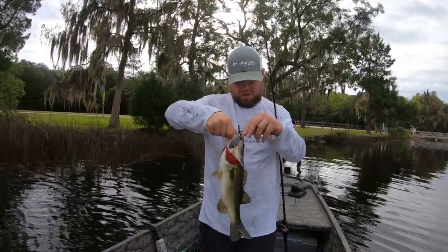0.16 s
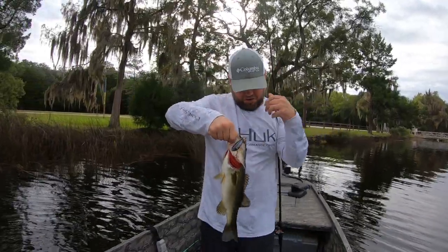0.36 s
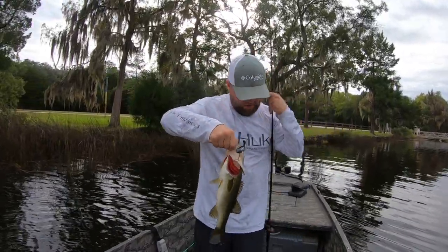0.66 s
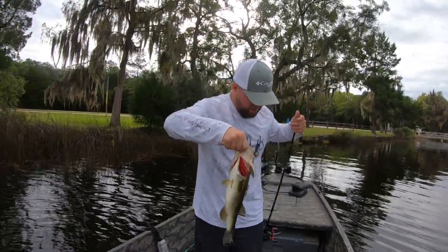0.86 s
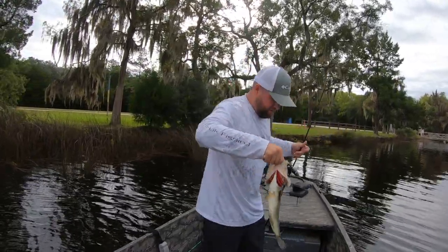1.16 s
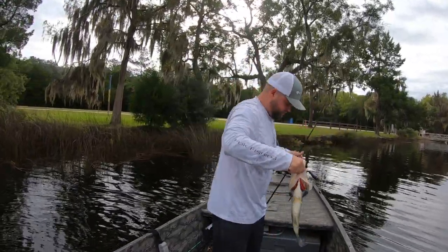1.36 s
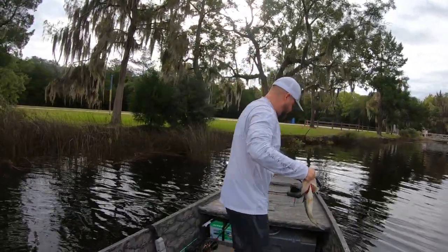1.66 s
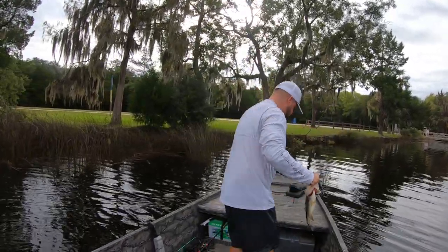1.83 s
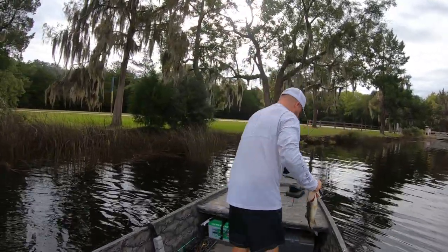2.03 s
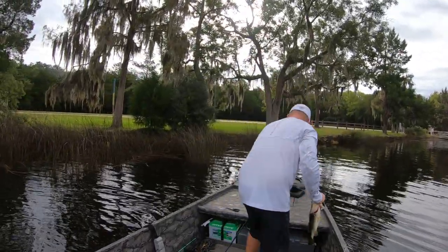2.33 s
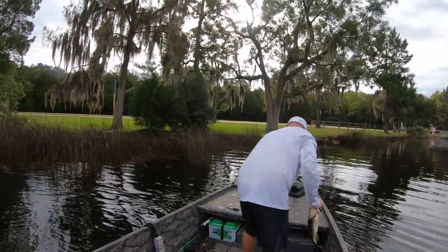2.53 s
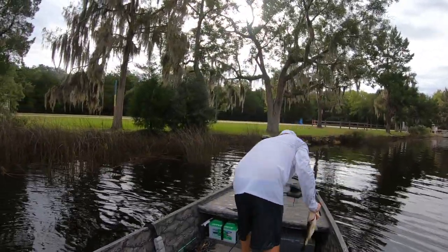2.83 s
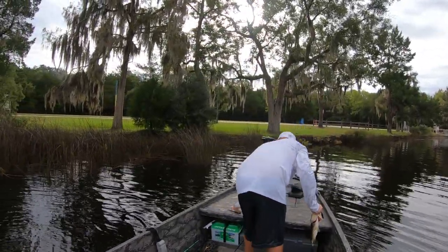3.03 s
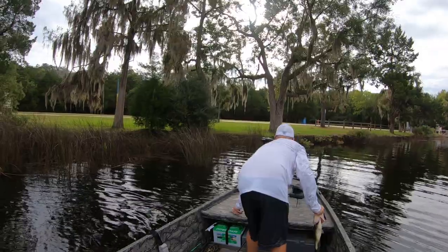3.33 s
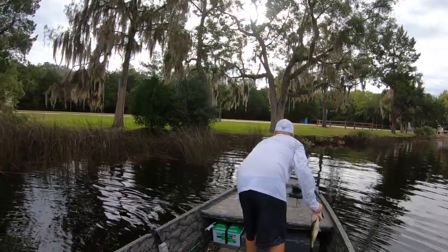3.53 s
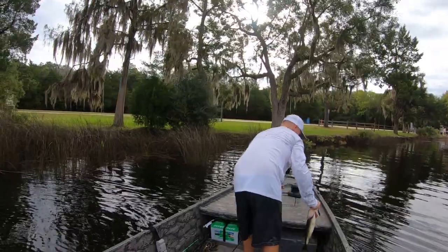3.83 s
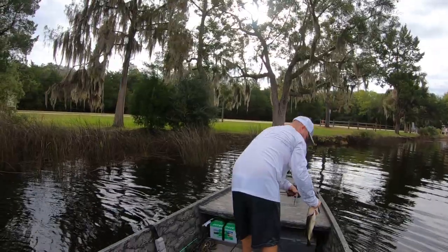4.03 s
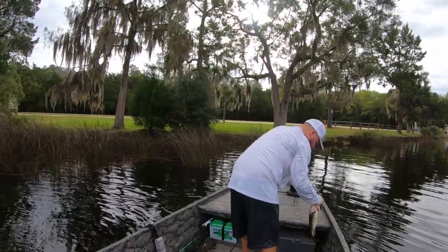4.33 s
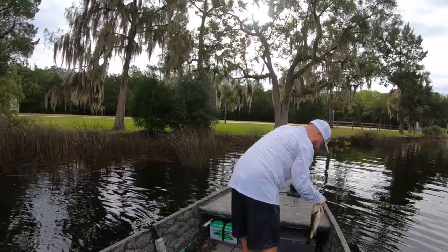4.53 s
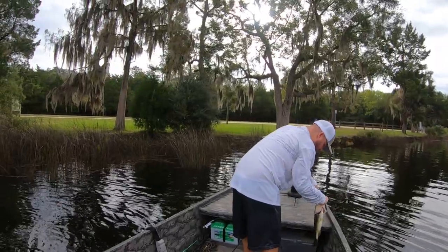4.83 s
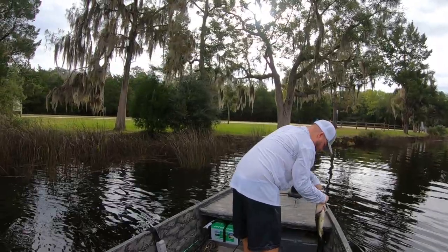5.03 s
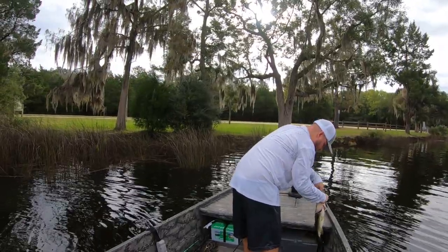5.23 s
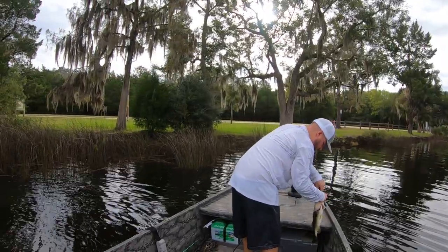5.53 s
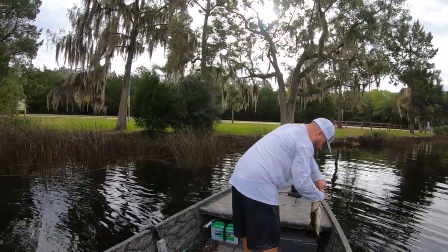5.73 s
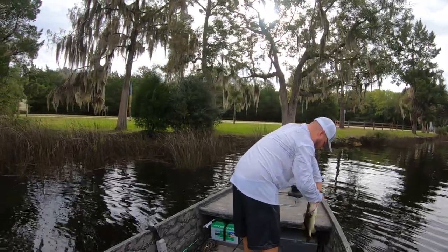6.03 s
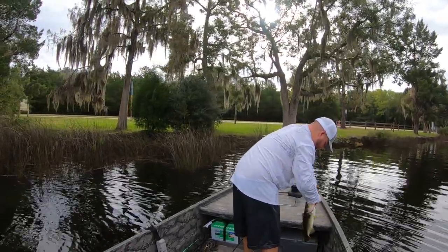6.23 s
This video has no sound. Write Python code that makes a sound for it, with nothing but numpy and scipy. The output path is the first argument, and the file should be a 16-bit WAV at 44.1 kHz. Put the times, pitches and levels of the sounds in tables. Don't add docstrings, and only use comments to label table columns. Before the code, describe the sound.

Outdoors on still water, a boat-mounted microphone hears soft open air, a low drone, distant road hum and very faint insects throughout. From 0 to 1.2 s there are light deck knocks, sole scuffs and cloth rustles, with bright lure clicks strongest near 0.63 s and short rubbery squeaks around 0.8 s. A step thuds at 1.3 s, with more scuffing and squeaking until 1.6 s, then a lull. Heavy steps boom in the hollow hull from 2.1 s, deepest around 2.36 s, with a heel rocking near 2.65 s. A rod butt cracks on the metal rim at 2.92 s and bounces at 3.0 s. From 3.27 s a loose lid bangs, drags and clatters, dropping hard at 3.53 s; its ring is stilled by 3.75 s. Then mostly quiet: faint knocks, bird whistles around 5.3 s, sharp small ticks at 5.95 and 6.12 s.

```python
import sys
import numpy as np
from scipy import signal
from scipy.fft import rfft, irfft, next_fast_len
from scipy.io import wavfile

SR = 44100
rng = np.random.default_rng(int(sys.argv[2]) if len(sys.argv) > 2 else 0)


def wav_record(signal):
    frames = np.transpose(np.atleast_2d(signal))
    bounded = np.clip(frames, -1, 1)
    quanta = np.round(bounded * 32767).astype(np.int16)
    wavfile.write(sys.argv[1], SR, quanta)


def boost_factor(decibels):
    exponent = np.asarray(decibels, float) / 20
    return 10 ** exponent


N = 281358


def at_hz(points, hz):
    points = np.array(points)
    return np.interp(np.log(hz), np.log(points[:, 0]), points[:, 1])


def rms_one(x):
    return x / np.sqrt(np.mean(x ** 2) + 1e-20)


def band_pass(x, order, low_hz, high_hz):
    return signal.sosfilt(signal.butter(order, [low_hz, high_hz], "band", fs=SR, output="sos"), x)


def drift(rate):
    knots = rng.standard_normal(int(N / SR * rate * 2) + 2)
    return np.interp(np.linspace(0, len(knots) - 1, N), np.arange(len(knots)), knots) * 2.51


def ring(force, hz, t60):
    r = boost_factor(-60 / (t60 * SR))
    w = 2 * np.pi * hz / SR
    return signal.lfilter([0, np.sin(w)], [1, -2 * r * np.cos(w), r * r], force + 1e-18)


def fade(x, t60):
    r = boost_factor(-60 / (t60 * SR))
    return signal.lfilter([1 - r], [1, -r], x + 1e-18)


def strike(modes, times, peak_db, spread_db, contact_s, chatter, low_hz, high_hz, rub=0, flip=-1):
    at = (np.clip(times, 0, None) * SR).astype(int)
    share = np.sqrt(sum(boost_factor(db) ** 2 for hz, db, t60 in modes))
    luck = rng.standard_normal((len(at), len(modes)))
    out, clicks = np.zeros(N), np.zeros(N)
    np.add.at(clicks, at, boost_factor(peak_db))
    after = chatter * fade(clicks, contact_s) * rng.standard_normal(N) * np.sqrt(contact_s * SR / 7)
    for k, (hz, level_db, t60) in enumerate(modes):
        force = after + rub * np.sqrt(28 / (t60 * SR))
        np.add.at(force, at, boost_factor(peak_db + spread_db * luck[:, k]))
        out += boost_factor(level_db) / share * ring(force, hz, t60) * flip ** k
    return band_pass(out, 3, low_hz, high_hz)


def friction(level_db):
    grain_db = 3.6 * drift(120) + 2.9 * drift(30)
    return boost_factor(level_db) * rms_one(rng.standard_normal(N) * boost_factor(grain_db))


def sliding(strokes, hiss_db):
    press_db_per_s, lift_db_per_s, swing_db = 302, 333, 24
    levels, t = np.full((4, N), -140.), np.arange(N) / SR
    for s, held, rasp_db, rumble_db, panels_db in strokes:
        on = slice(int((s - .3) * SR), int((s + held + .3) * SR))
        eased = np.maximum(press_db_per_s * (s - t[on]), lift_db_per_s * (t[on] - s - held)).clip(0)
        gone = 10 * (eased - swing_db).clip(0)
        layers = [rasp_db - eased,
                  rumble_db - 0.43 * eased,
                  rasp_db + panels_db - 0.78 * eased,
                  rasp_db + hiss_db - eased]
        levels[:, on] = np.maximum(levels[:, on], layers - gone)
    return levels


def glides(notes, rough_db, rough_hz):
    out = np.zeros(N)
    for s, length, from_hz, to_hz, level_db in notes:
        part = np.linspace(0, 1, int(length * SR))
        hz = from_hz * (to_hz / from_hz) ** part
        swell = np.abs(np.sin(np.pi * part)) ** 0.28
        tone = swell * np.sin(2 * np.pi * np.cumsum(hz) / SR)
        out[int(s * SR):int(s * SR) + len(part)] += boost_factor(level_db) * tone
    return out * boost_factor(rough_db * drift(rough_hz))


# frequency in Hz, likeness from -1 to 1.
LIKENESS = [(60, 0.7), (170, 0.35), (460, -0.74), (1260, -0.78), (3490, 0.55), (9630, -0.19)]


def pair(white, hz):
    alike = np.clip(at_hz(LIKENESS, hz), -1, 1)
    return np.sqrt(1 + alike) * white[0] + np.sqrt(1 - alike) * white[1] * [[1], [-1]]


# frequency in Hz, level in dB per Hz.
AIR = [(15, -47), (25, -17), (65, -14.5), (113, -30), (141, -11), (206, -6.5), (245, -11.5), (386, -22),
       (508, -18), (799, -19), (1390, -20.5), (1740, -26.5), (2290, -31.5), (7650, -39), (10100, -47.5),
       (13100, -76), (22000, -120)]


def air():
    out, together, edges = 0, drift(0.57), 25 * 2 ** np.arange(0, 9.5, .5)
    white = rng.standard_normal((2, 2, N))
    for k, (low, high) in enumerate(zip(edges, edges[1:])):
        band = band_pass(white[k % 2], 2, low, high)
        hz = np.sqrt(low * high)
        out = out + boost_factor(at_hz(AIR, hz) + .6 * together + 1.2 * drift(8)) * pair(band, hz)
    return boost_factor(-54.5 - 3.5) * rms_one(out)


# frequency in Hz, width in Hz, level in dB, swell in dB.
HUMS = [
    (180.5, 50, -63, 1.16),
    (769, 170, -64, 1.0),
    (3250, 370, -88.5, 2),
    (7510, 260, -82.5, .6),
]


def hums():
    out = 0
    for hz, width_hz, level_db, swell_db in HUMS:
        band = band_pass(rng.standard_normal((2, N)), 2, hz - width_hz / 2, hz + width_hz / 2)
        out = out + boost_factor(level_db + swell_db * drift(3)) * rms_one(pair(band, hz))
    return out


# start in seconds, length in seconds, from Hz, to Hz, level in dB.
BIRDS = [(5.295, 0.06, 3650, 3080, -66), (5.43, 0.08, 3400, 3150, -76), (5.6, 0.08, 3350, 3050, -77),
         (5.74, 0.07, 3300, 3100, -82), (5.345, 0.045, 3130, 2900, -55), (5.405, .035, 3150, 2950, -68),
         (5.28, 0.03, 2200, 1750, -73), (5.305, .055, 1780, 1500, -72), (5.385, 0.045, 2450, 1900, -71),
         (6.043, 0.011, 3400, 5370, -72), (6.054, 0.019, 5200, 3740, -68), (5.26, 0.025, 4600, 4500, -78),
         (4.62, .015, 2600, 4200, -72), (4.685, .012, 6200, 5000, -74), (4.74, .02, 7200, 5600, -73),
         (4.8, .06, 2100, 1800, -74)]


def birds():
    notes = glides(BIRDS, rough_db=0.9, rough_hz=118.3)
    t = np.arange(SR // 3) / SR
    trees = rng.standard_normal((2, len(t))) * boost_factor(-41 - 45 * t)
    return notes + signal.fftconvolve(notes[None], trees, axes=1)[:, :N]


# time of full pressure in seconds, rise in seconds, fall in seconds, level in dB.
RUSTLES = [(.17, 0.0076, 0.029, -65), (.365, 0.032, 0.056, -64), (.64, 0.046, 0.087, -62),
           (.78, 0.045, 0.025, -56.5), (.83, 0.019, 0.047, -59.5), (1.15, 0.049, 0.096, -63.5),
           (1.3, .015, .04, -61), (1.52, 0.041, 0.073, -65), (2.2, 0.012, 0.035, -63),
           (2.265, 0.0395, 0.047, -56), (5.52, .02, 0.035, -65), (5.955, .006, 0.067, -56.5),
           (6.29, 0.011, 0.023, -78)]
RUSTLE_TOPS_DB = [-1, -11.5, -10, -24, -27, -14, -11.5, -26, -30, -20.5, -16, -8, 9.5]


def rustle():
    level, t = np.zeros((2, 1, N)), np.arange(N) / SR
    for (s, rise, fall, level_db), top_db in zip(RUSTLES, RUSTLE_TOPS_DB):
        on = slice(int((s - .15) * SR), int((s + .4) * SR))
        away = np.maximum(((s - t[on]) / rise).clip(0) ** 2, (t[on] - s) / fall)
        level[..., on] += boost_factor([[[0]], [[top_db]]]) * boost_factor(level_db - 14.4 * away)
    hiss = rms_one(band_pass(rng.standard_normal((2, N)), 1, 2470, 9500))
    body, top = (signal.sosfilt(signal.butter(8, 10000, side, fs=SR, output="sos"), hiss)
                 for side in ("low", "high"))
    shared, opposed = (body * level[0] + top * level[1]) * boost_factor(3 * drift(200))
    return shared + .6 * opposed * [[1], [-1]]


# time in seconds, peak in dB, lower ring in dB above it.
RATTLE = [(0.168, -49, -12), (0.3423, -45, 13), (0.3554, -45.5, 17.5), (0.3653, -37, 9), (0.391, -54, 3),
          (0.5865, -53, 19), (0.609, -44, 12), (0.629, -39.5, 18.5), (0.635, -26, 7), (0.6475, -44, 13),
          (0.6544, -51.5, 13), (0.686, -52.5, 25.5), (1.1052, -38, 3), (1.1222, -32.5, 0.5),
          (1.1486, -38, -4), (2.242, -41, -10), (2.266, -33.5, 16), (3.0565, -38.5, -0.5), (5.314, -51, 6),
          (5.334, -51, 7), (5.5083, -46, -7), (5.5218, -39, -8)]
# frequency in Hz, level in dB, seconds to die by 60 dB.
LURE_HIGH = [(6320, 1.5, 0.013), (6950, -1.5, 0.011), (8060, -10, 0.0068), (11400, -23, 0.0034),
             (9740, -23, 0.015), (13400, -20, 0.0055)]
LURE_LOW = [(2130, -4.5, 0.0037), (3060, -4.5, 0.0085), (3440, -4.5, 0.0047), (4400, -11, 0.0019)]


def lure():
    s, peak_db, low_db = np.transpose(RATTLE)
    high = strike(LURE_HIGH, s, peak_db - 6.0, spread_db=2.4, contact_s=0.03, chatter=1.0,
                  low_hz=4500, high_hz=13000)
    low = strike(LURE_LOW, s, peak_db + low_db - 7.5, spread_db=1.6, contact_s=0.07, chatter=0.93,
                 low_hz=1180, high_hz=6500)
    return high + low


# start in seconds, length in seconds, from Hz, to Hz, level in dB.
SQUEAKS = [
    (.745, .03, 1900, 1750, -56),
    (.765, .035, 1850, 1480, -47),
    (.81, .03, 2000, 1550, -52),
    (1.225, .02, 2050, 1950, -55),
    (1.59, .04, 2500, 2050, -57),
    (1.40, .04, 1720, 2150, -54),
    (2.20, .045, 1790, 2300, -50),
    (3.975, .025, 1400, 1230, -65),
]


def squeaks():
    return glides(SQUEAKS, rough_db=2.4, rough_hz=248.4)


# frequency in Hz, level in dB, seconds to die by 60 dB.
SWAY = [(38, -6, .4), (52, 0, .35), (65.9, -1.5, .3)]
# time in seconds, peak in dB.
SWAYS = [
    (0.01, -48),
    (1.34, -45),
    (2.12, -44),
    (2.4, -44),
    (2.66, -43.5),
    (3.44, -52),
    (3.5, -56),
]


def hull_sway():
    s, peak_db = np.transpose(SWAYS)
    return strike(SWAY, s, peak_db, spread_db=2.1, contact_s=.04, chatter=.3, low_hz=25, high_hz=90)


# frequency in Hz, level in dB, seconds to die by 60 dB.
BOW_FLOOR = [(145, 0, .13), (172, -1, .12), (555, -12, .1)]
# time in seconds, peak in dB.
BOW_STEPS = [
    (1.322, -24),
    (1.331, -24),
    (2.305, -32),
]


def bow_steps():
    s, peak_db = np.transpose(BOW_STEPS)
    return strike(BOW_FLOOR, s, peak_db, spread_db=.6, contact_s=.02, chatter=.1,
                  low_hz=80, high_hz=900, flip=1)


# frequency in Hz, level in dB, seconds to die by 60 dB.
HEEL_PANEL = [(114.6, 1.5, 0.2), (270, -3.5, .22), (320.7, -6.5, 0.11), (401, -9.5, 0.14), (510, -13, .07),
              (635, -17, .1), (880, -20, .06)]
# time in seconds, peak in dB.
HEEL_ROCKS = [
    (1.331, -32),
    (1.388, -37.5),
    (2.114, -36.5),
    (2.634, -30.5),
    (2.658, -23),
    (2.667, -24.5),
    (2.686, -30.5),
    (2.715, -34.5),
]


def rocking_heel():
    s, peak_db = np.transpose(HEEL_ROCKS)
    return strike(HEEL_PANEL, s, peak_db, spread_db=2.8, contact_s=.02, chatter=.15,
                  low_hz=80, high_hz=1200)


# time in seconds, peak in dB.
GRAZES = [
    (2.9118, -49),
    (2.9, -56),
    (2.6481, -46),
    (2.6566, -52),
    (3.639, -49),
    (3.535, -19),
    (3.543, -24.5),
    (3.55, -30),
]


def grazes():
    s, peak_db = np.transpose(GRAZES)
    return strike(LID_EDGE, s, peak_db, spread_db=3.0, contact_s=0.011, chatter=1.3,
                  low_hz=1300, high_hz=7000)


# time in seconds, peak in dB.
SNAPS = [
    (2.9233, -8),
    (2.9997, -10.5),
    (3.5326, -10),
    (5.9465, -27.5),
]


def snaps():
    clicks = np.zeros(N)
    for s, peak_db in SNAPS:
        clicks[int(s * SR)] = -4.5 * boost_factor(peak_db)
    return band_pass(clicks + 1e-18, 4, 1300, 5800)


# frequency in Hz, level in dB, seconds to die by 60 dB.
LID_FREE = [(198.6, -6, .3), (236, -8.5, .4), (250, -5.5, .5), (322, -11.5, 0.398), (337, -8.5, 0.47),
            (518, -8.5, .25), (578, -5.5, .2), (641, -2, .45), (921, -3, 0.15), (958, 0, .2),
            (984, -2, .17)]
# time in seconds, peak in dB.
LID_DROP = [
    (3.533, -21),
    (3.548, -23.5),
    (3.562, -27.5),
]


def lid_drop():
    s, peak_db = np.transpose(LID_DROP)
    free = strike(LID_FREE, s, peak_db, spread_db=1.3, contact_s=.02, chatter=0.16,
                  low_hz=170, high_hz=1400)
    return hand_on_lid(free) * boost_factor(1.4 * drift(30))


def hand_on_lid(x):
    return x * boost_factor(-300 * np.clip(np.arange(N) / SR - 3.75, 0, 1))


def blow_rows(rows, top_db, length):
    rows = np.array(rows)
    return np.column_stack([rows[:, :3], top_db + 0 * rows[:, 0], length + 0 * rows[:, 0]])


# time in seconds, sheet peak in dB, panels in dB above it, length in % of a free ring.
KNOCKS = [(0.0, -41, 5.5, 250), (0.063, -39.5, -1, 65), (0.206, -40, 4.5, 150), (0.275, -41, -6, 85),
          (0.391, -47.5, -1.5, 290), (0.8062, -35, -16, 215), (0.9202, -44.5, 5.5, 130),
          (0.998, -37.5, 3, 110), (1.286, -30, 2, 216), (1.324, -39.5, 21, 86), (1.4744, -35.5, -18, 340),
          (1.68, -37, 4, 99), (2.1514, -23.5, 5, 69), (2.2048, -31.5, 0, 110), (2.257, -40, 5, 220),
          (2.3596, -32, 19.5, 134), (2.4204, -33.5, -4.5, 44), (2.5693, -52.5, 13, 39),
          (3.935, -50.5, -2, 100), (4.1004, -41, -16, 92), (4.257, -48.5, -1.5, 44), (6.34, -58, 5, 68),
          (5.3297, -43, -14, 85), (5.5062, -38, -16, 140), (5.836, -39.5, 1, 165)]
# time in seconds, sheet peak in dB, weight as panels in dB above it.
PADS = [(0.447, -38, -15), (0.773, -35, -20), (1.1745, -39.5, 7.5), (1.224, -32.5, -24),
        (1.3843, -36, 11.5), (1.4145, -34.5, -2), (1.588, -38, -33), (2.1124, -54, 31), (2.13, -32, 1.5),
        (2.423, -32.5, -19), (2.628, -48, -4), (2.6534, -33, 9), (2.6773, -49.5, 14)]


def deck_blows():
    pad_length = 70 * boost_factor(-0.067 * np.array(PADS)[:, 2])
    return np.vstack([blow_rows(KNOCKS, top_db=-16.5, length=np.array(KNOCKS)[:, 3]),
                      blow_rows(PADS, top_db=-30.5, length=pad_length)])


# time in seconds, sheet peak in dB, panels in dB above it.
TICKS = [(1.8193, -47.5, -22), (3.131, -50, -22), (2.862, -55, -41.5), (3.2106, -42.5, 6),
         (3.7964, -52, -20), (3.823, -41.5, -40), (4.305, -76, -8), (4.4, -52, -4), (4.6599, -55, -6),
         (4.76, -63, -1), (5.5204, -51, -42.5), (5.9451, -23, -12), (6.118, -26, 0)]


def tick_blows():
    return blow_rows(TICKS, top_db=-3.5, length=63 * boost_factor(-0.13 * np.array(TICKS)[:, 2]))


# time in seconds, deck drum peak in dB, hull boom in dB above it.
THUMPS = [(0.0, -33, 4.5), (0.03, -35.5, 1.5), (0.199, -46, -21), (1.001, -41, -26), (1.284, -49, -2),
          (1.327, -27, 2.5), (1.383, -28.5, -2.5), (1.419, -29, -7), (1.676, -37.5, -26),
          (2.115, -20, -6.5), (2.146, -13, -19), (2.22, -32, 0), (2.248, -24, 0), (2.299, -32.5, -8),
          (2.360, -3, -19.5), (2.394, -17.5, -3), (2.433, -23, 7), (2.574, -17, -10), (2.629, -25, 6),
          (2.654, -21.5, 0), (2.702, -42, 14), (2.923, -27.5, -3), (2.943, -20.5, 1.5), (3.01, -21, -5.5),
          (3.04, -25.5, 2), (3.119, -35, 0), (3.187, -46, 5.5), (4.258, -44.5, -15), (5.83, -50, -21),
          (5.863, -43.5, -11.5)]
# time in seconds, deck drum peak in dB.
JOLTS = [
    (3.276, -22),
    (3.31, -21.5),
    (3.377, -27.5),
    (3.428, -28.5),
    (3.462, -30.5),
    (3.529, -27),
]


def weight():
    return np.transpose(THUMPS + [(s, db, -29) for s, db in JOLTS])


# frequency in Hz, level in dB, seconds to die by 60 dB.
BOOM = [(61.6, -19.5, 0.38), (87.8, -11.5, 0.53), (96.3, -6, 0.42), (115.65, 2, 0.43), (129.6, -16, 0.23),
        (141.2, -5.5, 0.37)]
DRUM = [(155, -19.5, .2), (177.7, -7, 0.21), (195.4, -8.5, 0.59), (210.5, 10, 0.18), (233.4, -16.5, 0.74),
        (257.4, -8.5, 0.15)]


def hull_and_deck(underfoot, rub_db):
    s, drum_db, boom_db = weight()
    boom = strike(BOOM, s + .004, drum_db + boom_db - 2.0, spread_db=1.1, contact_s=0.018, chatter=0.23,
                  low_hz=36, high_hz=261.6, rub=0.37 * underfoot)
    drum = strike(DRUM, s, drum_db - 4.0, spread_db=0.78, contact_s=.03, chatter=0.2,
                  low_hz=134.4, high_hz=410, rub=0.2 * friction(rub_db[1]),
                  flip=0.98)
    return boom + drum


# frequency in Hz, level in dB, seconds to die by 60 dB.
PANELS = [(290.4, -2, 0.22), (331.1, 2.5, 0.19), (382, 0, 0.17), (416.7, 0.5, 0.12), (446.7, -2.5, 0.16),
          (484, -2.5, 0.1), (526, -9, 0.13), (566, -3.5, 0.059), (724, -9, 0.29), (954, -28, 0.1)]


def floor_panels(deck, underfoot):
    s, drum_db, _ = weight()
    knocked = strike(PANELS, deck[:, 0], deck[:, 1] + deck[:, 2] - 6, spread_db=2.3, contact_s=0.027,
                     chatter=0.289, low_hz=216, high_hz=1900)
    flexed = strike(PANELS, s + .003, drum_db - 16, spread_db=2.5, contact_s=0.045, chatter=0.69,
                    low_hz=240, high_hz=700, rub=0.08 * underfoot)
    return knocked + flexed


# time in seconds, sheet peak in dB, panels in dB above it.
ROD_BLOWS = [
    (2.9226, -5.5, -18),
    (2.9993, -9, -14.5),
    (3.048, -38, 1),
]


def rod_blows():
    return blow_rows(ROD_BLOWS, top_db=-18.5, length=72.4)


# frequency in Hz, level in dB, seconds to die by 60 dB.
GUNWALE = [(1680, -8.5, 0.14), (1840, -9.5, 0.05), (2077, -14, 0.12), (2217, -13, 0.12),
           (2550, -32.5, 0.122), (2993, 3.5, 0.042), (3240, 3, 0.042), (3710, -0.5, 0.054),
           (4040, 0, 0.047)]
FIRST_SPOT = [(613, -13, 0.11), (690, 0, 0.12), (732, -2.5, 0.23), (957, -1, 0.23), (1450, 0, 0.065)]
SECOND_SPOT = [(486, -2.5, 0.1), (702, -1, 0.14), (730, -7.5, 0.32), (921, -2.5, 0.19), (1030, -9, 0.091)]
LID_EDGE = [(2073, -3.5, 0.035), (2936, 4, 0.03), (3230, 0.5, 0.04), (3576, -3, 0.04), (4257, -6, 0.031)]


def gunwale(rod, lid):
    rim = strike(GUNWALE, rod[:, 0] + .003, rod[:, 1] - 11, spread_db=0.61, contact_s=0.019, chatter=0.3,
                 low_hz=386, high_hz=7700)
    first = strike(FIRST_SPOT, rod[:1, 0] + .004, rod[:1, 1] - 19, spread_db=0, contact_s=0.022,
                   chatter=0.41, low_hz=386, high_hz=3000)
    after_bounce = np.clip(np.arange(N) / SR - rod[1, 0], 0, 1)
    first = first * boost_factor(-900 * after_bounce)
    second = strike(SECOND_SPOT, rod[1:, 0] + 0.0036, rod[1:, 1] - 16, spread_db=0, contact_s=.02,
                    chatter=.3, low_hz=300, high_hz=3000)
    edge = strike(LID_EDGE, lid[:, 0], lid[:, 1] - 19, spread_db=2.5, contact_s=.03, chatter=2.0,
                  low_hz=1500, high_hz=6400)
    return rim + first + second + edge


# time in seconds, plate peak in dB, then lid ring and plate top
# in dB above that peak.
LID_BLOWS = [(3.27, -9.5, -0.5, -33.5), (3.281, -23, 5.5, -43), (3.292, -30, 6, -51),
             (3.3467, -28, -3, -41), (3.358, -27.5, -0.5, -38.5), (3.374, -17, 0, -42.5),
             (3.4, -26.5, -1.5, -32), (3.4194, -13.5, 1.5, -25), (3.431, -27.5, 6, -38.5),
             (3.46, -13, 2, -25), (3.474, -20, 5.5, -36), (3.492, -25.5, 5.5, -35),
             (3.5284, -2.5, -10, -23.5), (3.54, -14, -2.5, -37), (3.551, -27.5, 7.5, -38),
             (3.6247, -38.5, 5.5, -15), (3.6443, -45, 1.5, -22)]


def lid_blows():
    return blow_rows(LID_BLOWS, top_db=np.array(LID_BLOWS)[:, 3], length=68.2)


# frequency in Hz, level in dB, seconds to die by 60 dB.
LID = [(205.2, -7, 0.5), (249.7, -12.5, 0.48), (337.4, -13, 0.24), (406.2, -6.5, 0.23), (482, -4.5, 0.25),
       (508, -11, 0.36), (573, -5.5, 0.26), (633, -14.5, 0.19), (722.4, -5, 0.13), (879, -12, 0.18),
       (913.5, -4.5, 0.13), (966, -5.5, 0.16), (1004, -7.5, 0.13), (1075, -10, 0.15)]


def lid_ring(lid, drag_db):
    rings = strike(LID, lid[:, 0], lid[:, 1] + lid[:, 2] - 7, spread_db=3.1, contact_s=0.025, chatter=0.33,
                   low_hz=170, high_hz=1400, rub=0.38 * friction(drag_db[2]))
    return hand_on_lid(rings)


# frequency in Hz, level in dB.
PLATE = [(280, -10.5), (1000, -11), (1400, -8), (2000, -10.5), (3200, -7), (4500, -5.5), (6000, -2.5),
         (8000, -7.5), (10000, -24), (12000, -37.5), (15000, -52.5)]
# frequency in Hz, seconds to die by 60 dB.
PLATE_T60 = [(280, 0.22), (1200, 0.086), (3000, 0.09), (6000, 0.079), (14000, 0.046)]
COLUMN_HZ = np.log([600, 2200, 7000])


def clatter(blows, rub_db, light, hollow, heavy):
    edges = 280 * 2 ** (np.arange(19) / 3)
    at, t = (blows[:, 0] * SR).astype(int), np.arange(SR // 5) / SR
    luck, white = rng.standard_normal((len(at), len(edges))), rng.standard_normal((2, 2, N))
    grain, out = boost_factor(1.1 * drift(150) + 0.69 * drift(35)), 0
    landing = np.ones((len(at), len(t)))
    landing[-heavy:] = 1 - np.exp(-t / .0025)
    lengths = np.clip(blows[:, 4], 20, 300) / 100
    for k, (low, high) in enumerate(zip(edges, edges[1:])):
        hz = np.sqrt(low * high)
        low_part, mid_part, top_part = (np.interp(np.log(hz), COLUMN_HZ, corner) for corner in np.eye(3))
        sizes = boost_factor(blows[:, 1] + low_part * blows[:, 2] + top_part * blows[:, 3] + 2.0 * luck[:, k])
        sizes[:light] *= boost_factor(15.5 * min(np.log2(hz / 755), 0))
        sizes[-hollow:] *= boost_factor(-9 * np.exp(-(np.log2(hz / 1280) / 0.3) ** 2))
        dying, cracks = np.zeros(N + len(t)), np.zeros(N)
        cracks[at] = sizes
        cracks[at[-hollow:-heavy]] *= boost_factor(-2.5)
        cracks[at[-heavy:]] *= boost_factor(-6.5)
        rise = 1 - np.exp(-t * hz / 1.9)
        for start, size, factor in zip(at, sizes[:, None] * landing, lengths):
            fall_db = -60 * t / (factor * at_hz(PLATE_T60, hz))
            fall = boost_factor(fall_db) + boost_factor(fall_db / 4.05 - 23.5)
            dying[start:start + len(t)] += size * rise * fall
        rubbing_db = low_part * rub_db[2] + mid_part * rub_db[0] + top_part * rub_db[3]
        rubbing = boost_factor(rubbing_db + 1.5 * drift(25)) * grain
        apart = 0.071 + 0.46 * hz / 10000
        force = (boost_factor(-9.0) * dying[:N] + boost_factor(-5.0) * rubbing) * white[k % 2] * [[1], [apart]]
        force[0] += boost_factor(-7.5 - 9.9 * top_part - 4.7 * low_part) * np.sqrt(SR / (high - low)) * cracks
        shared, opposed = band_pass(force, 3, low, high) * np.sqrt(SR / 2 / (high - low))
        out = out + boost_factor(at_hz(PLATE, hz)) * (shared + opposed * [[1], [-1]])
    return out


# time of full pressure in seconds, seconds held, rasp in dB,
# hull rumble in dB, panels in dB above the rasp.
SCUFFS = [(0.65, 0.084, -47.5, -54, -17), (0.77, 0.072, -47, -56, -13), (1.12, 0.16, -55, -65, -12),
          (1.40, 0.06, -52.5, -39, 4.5), (1.47, 0.14, -49.5, -55, -11), (1.9, 0.073, -60.5, -67, -3),
          (2.16, 0.076, -45.5, -22.5, 4), (2.25, 0.03, -35.5, -29, -11.5), (2.65, 0.016, -47, -25, 3),
          (3.03, 0.0093, -53, -21, 9), (3.09, 0.11, -80, -33.5, -1), (3.222, 0.02, -61, -42.5, 2),
          (4.194, 0.25, -62, -72, -1)]
DRAG = [
    (3.31, 0.097, -45.5, -31.5, 19.1),
    (3.42, 0.04, -42, -37, 11),
]


def boat():
    deck, ticks, rod, lid = deck_blows(), tick_blows(), rod_blows(), lid_blows()
    scuff_db, drag_db = sliding(SCUFFS, hiss_db=-15), sliding(DRAG, hiss_db=-27)
    rub_db = np.maximum(scuff_db, drag_db)
    underfoot = friction(scuff_db[1])
    lid_on_sheet = lid - [0, 0.0, 3.0, 1, 5.5]
    sheet = clatter(np.vstack([ticks, deck, rod, lid_on_sheet]), rub_db,
                    light=len(ticks), hollow=len(rod) + len(lid), heavy=len(lid))
    body = hull_and_deck(underfoot, rub_db) + floor_panels(deck, underfoot)
    struck = body + gunwale(rod, lid) + lid_ring(lid, drag_db) + sheet + squeaks()
    return struck + hull_sway() + bow_steps() + rocking_heel() + grazes() + snaps() + lid_drop()


# frequency in Hz, left minus right in dB.
BOAT_BALANCE = [(30, 1.5), (70, -6), (125, -1.5), (250, 1), (500, -1.5), (1000, -7.5), (2000, -5),
                (4500, -3.5), (9600, -5)]
# frequency in Hz, radians by which left leads.
BOAT_PHASE = [(60, 0.93), (250, 0.24), (1210, 0.94), (1720, 1), (4130, 0.47), (5940, -1.5), (7400, -1.8),
              (9800, -3)]


def two_ports(x):
    size = next_fast_len(N + 4096)
    hz = np.maximum(np.arange(size // 2 + 1) * SR / size, 1)
    half = boost_factor(at_hz(BOAT_BALANCE, hz) / 2) * np.exp(.5j * at_hz(BOAT_PHASE, hz))
    lags = rng.uniform(0.000931, 0.015, (2, 8, 1))
    echoes = np.sum(boost_factor(-lags * 4300) * np.exp(-2j * np.pi * hz * lags), axis=1) * hz / (hz + 1500)
    ports = np.array([half, 1 / half]) * (1 + boost_factor(-13.0) * echoes)
    return irfft(rfft(x, size) * ports, size)[:, :N]


def scene():
    around = air() + hums() + birds() + rustle() + lure() * boost_factor([[-.5], [.5]])
    return around + two_ports(boat())


def band_limit(x):
    return signal.sosfilt(signal.butter(12, 15200, fs=SR, output="sos"), x)


def record(dry):
    mix = signal.sosfilt(signal.butter(2, 40, "high", fs=SR, output="sos"), dry)
    return band_limit(mix)


dry = scene()
out = record(dry)
wav_record(out)
```